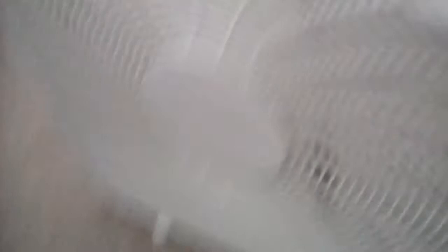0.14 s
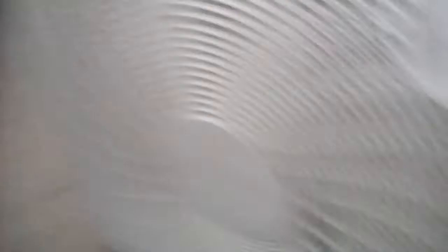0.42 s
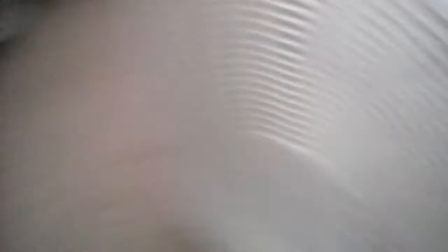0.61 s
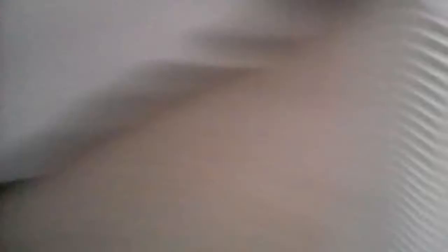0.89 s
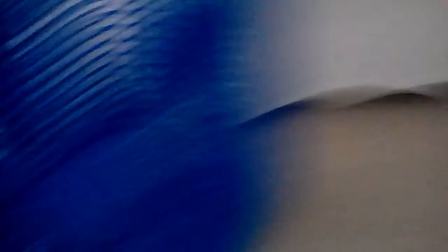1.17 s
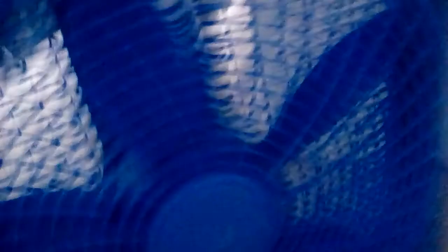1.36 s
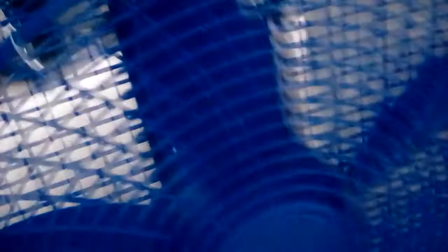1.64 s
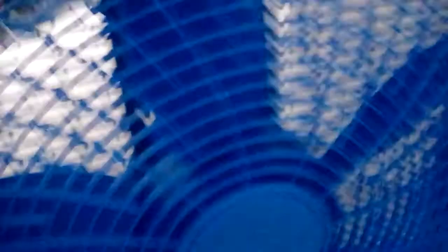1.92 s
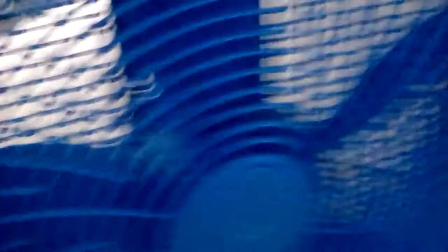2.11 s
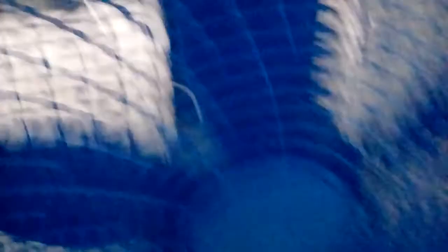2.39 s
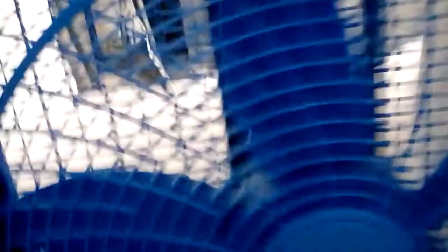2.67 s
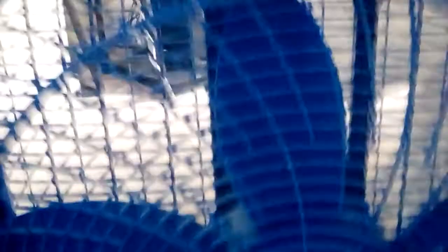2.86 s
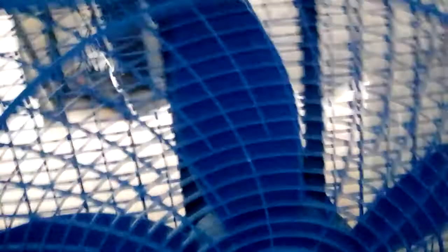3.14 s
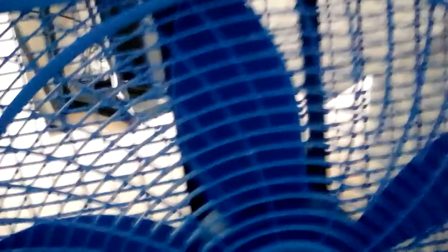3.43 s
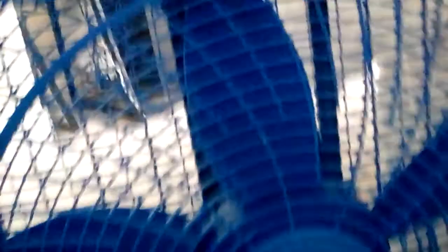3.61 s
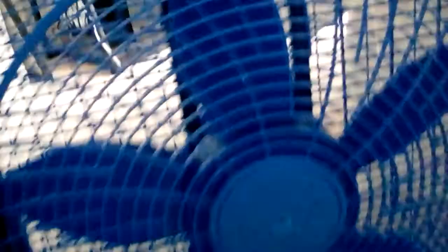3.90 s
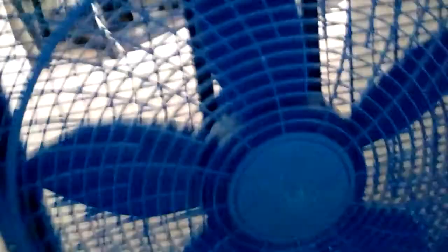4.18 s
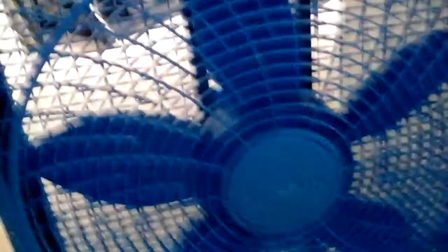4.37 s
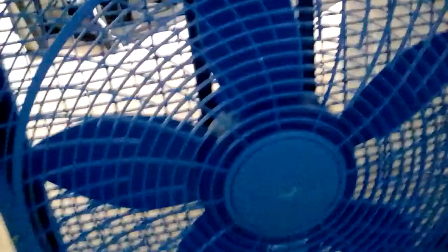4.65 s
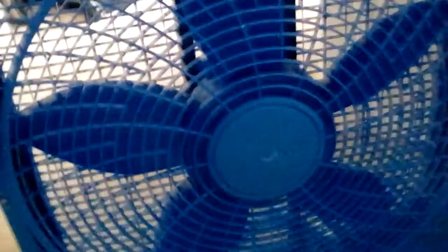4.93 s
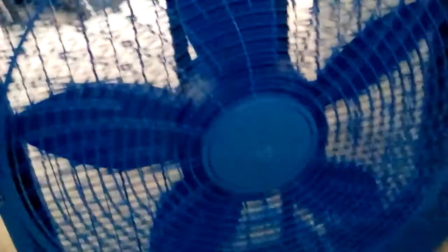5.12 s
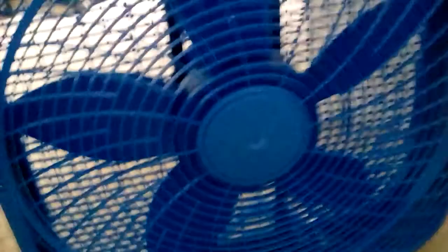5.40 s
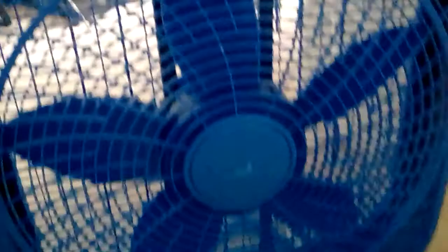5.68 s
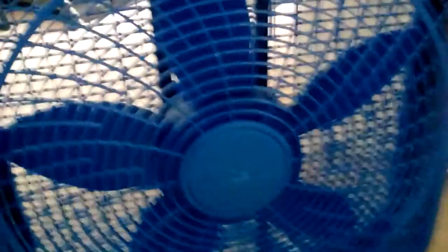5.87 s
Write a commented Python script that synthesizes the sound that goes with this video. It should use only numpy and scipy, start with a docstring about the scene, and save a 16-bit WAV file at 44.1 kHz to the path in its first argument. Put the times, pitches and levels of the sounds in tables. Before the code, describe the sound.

For the first 1.2 seconds there is a very quiet room: soft low rumble, thin hiss, and faint rustles of a hand shifting on the microphone around 0.5 to 0.7 and again near 1.1. At 1.2 a loud, crisp plastic knob snap rings the fan's housing very briefly, with a faint rattle. At 1.6 a softer tick is followed at 1.7 by a second clear, duller clack, with a tiny knock near 1.9. Meanwhile the close box fan begins turning. Its low, slightly fuzzy blade hum slides upward, fast at first and then slowing, swelling as it passes room resonances. Airy turbulence emerges by about 2 seconds and keeps growing louder and brighter, with gentle blade flutter and small changes as the microphone drifts. By 4 to 6 seconds it is a strong, full rush over a low drone, still rising slightly when it cuts off.

```python
"""A quiet room with low rumble and thin hiss; a hand shifts faintly on the microphone.
At 1.2 s a box fan is switched on close by: its plastic knob snaps through detents, ringing the housing.
From then the rotor gathers speed: blade tones climb through the room's standing waves, and the rush
of air, shaped noise pumped slightly by each blade pass, grows louder and brighter to the end.
A very faint, brief tick near 1.7 kHz falls at about 1.88 s."""
import sys
import numpy as np
from scipy import signal
from scipy.io import wavfile
from scipy.ndimage import uniform_filter1d

SR = 44100
rng = np.random.default_rng(int(sys.argv[2]) if len(sys.argv) > 2 else 0)


def linear_from_db(decibels):
    """Turn decibels (scalar or array-like) into linear amplitude factors; 0 gives 1."""
    return 10 ** (np.asarray(decibels, float) / 20)


def waveform_to_disk(signal):
    """Save audio, clipped to [-1, 1], as 16-bit WAV at the path in sys.argv[1]."""
    frames = np.transpose(np.atleast_2d(signal))
    scaled = np.clip(frames, -1, 1) * 32767
    samples = np.round(scaled).astype(np.int16)
    wavfile.write(sys.argv[1], SR, samples)


N = 266099

REFERENCE_HZ = 92  # blade rate at which the fan's levels are given
SWITCH_ON_S = 1.2
GUSTS_ABOVE_HZ = 3600

# The hand-held microphone drifts to and from the blades. Each row: time in seconds, level in dB.
NEARNESS = [(1.2, 2), (1.4, 2.5), (1.6, 1.5), (1.8, 0), (2.0, -1.08), (2.6, -0.8086), (2.75, -0.69),
            (2.95, 0), (3.3, -0.829), (4.1, 1.1127), (4.8, 0.5), (5.15, 1.632), (5.6, 1), (6.03, 0.3252)]


def evened(x):
    """Scales to rms 1."""
    return x / np.sqrt(np.mean(x ** 2) + 1e-20)


def read(points, hz):
    """Reads a table on a log-frequency axis."""
    f, value = np.transpose(points)
    return np.interp(np.log(hz + 1), np.log(f + 1), value)


def follow(rows, t):
    """Reads a curve at times t."""
    return np.interp(t, *np.transpose(rows))


def treble_share(hz, corner_hz):
    """Weight rising from 0 in the bass to 1 well above the corner."""
    return 1 / (1 + (corner_hz / (hz + 1)) ** 4)


def standing_db(hz):
    """Lift that the room's standing waves give at each frequency."""
    # Each row: frequency in Hz, width in Hz, lift in dB.
    standing = [(124.16, 31, 5), (151.75, 16, 4), (173.31, 18, 6), (200, 10, -1), (231.73, 4.8, 4),
                (257.66, 5.6, 0.5), (284.71, 12, 4), (299.07, 23, -3), (334.47, 21, 5.5), (455.1, 57, -2),
                (719.19, 27, 4.5)]
    return sum(db / (1 + ((hz - f) / (width / 2)) ** 2) for f, width, db in standing)


def noise(field_db, patchy_db, flicker_db=0, gust_db=0):
    """Random short-time spectra shaped by field_db(s, Hz), with drifting patches and treble puffs and gusts."""
    flicker_above_hz = 6200
    t = np.arange(N // 512 + 5)[:, None] * 512 / SR
    hz = np.fft.rfftfreq(2048, 1 / SR)
    a, b, patches, puffs, gusts = rng.standard_normal((5, len(t), len(hz)))

    def smooth(x, frames, bins):
        return evened(uniform_filter1d(uniform_filter1d(x, size=frames, axis=0), size=bins, axis=1))

    patches = smooth(patches, 5, 8)
    puffs = smooth(puffs, 2, 120) * treble_share(hz, flicker_above_hz)
    gusts = smooth(gusts, 7, 60) * treble_share(hz, GUSTS_ABOVE_HZ)
    level_db = field_db(t, hz) + patchy_db * patches + flicker_db * puffs + gust_db * gusts
    z = (a + 1j * b) * linear_from_db(level_db)
    return signal.istft(z.T, nperseg=2048, noverlap=1536)[1][:N]


def wander(width_hz):
    """Slow complex noise of rms 1, from two equal one-pole low-passes."""
    r = np.exp(-np.pi * width_hz / SR)
    z = rng.standard_normal(N + SR) + 1j * rng.standard_normal(N + SR)
    z = signal.lfilter([1], [1, -r], z)
    z = signal.lfilter([1], [1, -r], z)[SR:]  # the first second only settles the filters
    return z / np.sqrt(np.mean(abs(z) ** 2))


def speed(t):
    """Blades passing a strut each second: a quick first pull of the motor, then a slow approach to the top."""
    top_hz, spin_up_s = 105.5, 2.3  # spin_up_s and kick_s are time constants
    kick_share, kick_s = .168, .05
    on = np.maximum(t - SWITCH_ON_S, .02)
    return top_hz * (1 - (1 - kick_share) * np.exp(-on / spin_up_s) - kick_share * np.exp(-on / kick_s))


def rush(t, hz, turns):
    """Turbulence: its spectrum slides up as the blades gain speed, and each blade pass pumps it slightly."""
    # Eddy noise at the reference rate. Each row: frequency in Hz, relative density in dB per Hz.
    eddies = [(30, 2), (150, -1.5), (500, -1.5), (1600, -5.5), (3000, -12), (4500, -15.5), (6500, -20.5),
              (8500, -30.5), (12000, -48.5), (24000, -75.5), (150000, -150)]
    # Fixed colour of frame and microphone, plus a steep drop near 15.8 kHz.
    # Each row: frequency in Hz, gain in dB.
    frame = [(15, -20), (27, -10), (45, -21), (100, -8), (300, -2.5), (500, .5), (1000, -1.5), (1800, .5),
             (2600, -1.5), (3100, -4.5), (3700, -4.5), (4300, -9.5), (5100, -11), (5900, -6), (6500, -4),
             (6900, -6.5), (7400, -7), (8100, -11), (9400, -5), (10500, -6), (12000, -9), (15700, -15),
             (15850, -32)]
    # Blade-tip hiss as the microphone turns. Each row: time in seconds, treble lift in dB.
    aim = [(1.2, 0.5), (2.0, 3), (2.45, -5), (2.75, -0.5), (2.95, -3.5), (3.3, -0.5), (3.8, -2), (4.5, 0.5),
           (5.2, -0.5), (6.03, 0.5)]
    reference_db, growth_db_per_db = -32.5, 2.521  # growth is per dB of speed

    def colour(s, f):
        slide = (REFERENCE_HZ / speed(s)) ** 1.0047
        db = read(eddies, f * slide) + read(frame, f) + 0.5 * standing_db(f)
        db = db + follow(aim, s) * treble_share(f, GUSTS_ABOVE_HZ)
        core = (f > 300) & (f < 3000)  # this band holds equal power in every frame
        return db - 10 * np.log10(np.sum(linear_from_db(2 * db[:, core]), axis=1, keepdims=True))

    air = evened(noise(colour, patchy_db=0.6796, flicker_db=2.5, gust_db=0.9746))
    air = air * (1 + 0.033 * np.cos(2 * np.pi * turns))
    speed_db = 20 * np.log10(hz / REFERENCE_HZ)
    level_db = reference_db + growth_db_per_db * speed_db + follow(NEARNESS, t)
    return air * linear_from_db(level_db) * (t > SWITCH_ON_S)


def tones(t, hz, turns):
    """Clean multiples of the blade rate, and a fuzzy stack just under them from blades cutting swirling eddies."""
    # Clean tones, one row a multiple. Each row: level at the reference rate in dB, growth in dB per dB of speed.
    blades = [(-62.5, 11), (-43.5, 3), (-48, 3.5), (-57, 2.5), (-51.5, 2), (-58.5, 1.5)]
    # Fuzzy stack, one row a multiple. Each row: level at the reference rate in dB,
    # growth in dB per dB of speed, width in Hz.
    swirl = [(-57, 5, 3.511), (-52.5, 1.451, 3.3), (-47, 2.5, 8), (-46, 2.5, 10), (-48.5, 2, 6.7),
             (-50, 2.5, 15), (-49, 3, 13.346)]
    swirl_lag = .925  # the eddies swirl after the blades, so they are cut at this share of the blade rate
    nearness_share = 0.41  # share of the nearness in dB that the tones feel
    speed_db = 20 * np.log10(hz / REFERENCE_HZ)
    both = np.zeros(N)
    for k, (db, growth) in enumerate(blades, 1):
        waver = 1 + 0.18 * wander(width_hz=3.2)
        carrier = np.exp(2j * np.pi * k * turns)
        both += linear_from_db(db + growth * speed_db + standing_db(k * hz)) * (waver * carrier).real
    for k, (db, growth, width) in enumerate(swirl, 1):
        waver = 0.29 + 0.84597 * wander(width)
        carrier = np.exp(2j * np.pi * k * swirl_lag * turns)
        both += linear_from_db(db + growth * speed_db + standing_db(k * swirl_lag * hz)) * (waver * carrier).real
    return np.sqrt(2) * both * linear_from_db(nearness_share * follow(NEARNESS, t)) * (t > SWITCH_ON_S)


def knob():
    """Each strike rings the housing modes near its own pitch, treble first; a faint echo and thin rattle follow."""
    # Each row: start in seconds, level in dB, centre of the blow's spectrum in Hz, spread in octaves.
    strikes = [(1.2094, -47, 2500, 0.7296), (1.2126, -13.5, 12500, 0.3796), (1.2124, -6.5, 299, 0.9434),
               (1.2123, -4, 3891, 0.7397), (1.2124, -11.5, 3600, 0.14), (1.2128, -3.5, 811.1, 0.5344),
               (1.2135, -10, 1750, 0.288), (1.6082, -32, 2945, 0.3493), (1.6082, -26, 1750, 0.157),
               (1.6085, -40.5, 5800, 0.12), (1.6087, -18.5, 434.4, 0.5089), (1.6908, -21, 6300, 0.4685),
               (1.691, -12.5, 168.8, 1.115), (1.691, -13, 2918, 0.2762), (1.6904, -9.5, 2056, 0.2073),
               (1.6911, -14.5, 720, 0.2916), (1.879, -21.5, 200, 0.871)]
    # Plastic housing modes. Each row: frequency in Hz, level in dB, ungripped t60 in seconds.
    housing = [(130, -8, 0.02), (190, -5.5, 0.011), (299.33, -0.5, 0.015), (397, -6, 0.009),
               (520, -11, 0.0049), (694.8, 2.5, 0.011), (843, -2.5, 0.0086), (1161.3, -0.5, 0.019),
               (1776, -7.5, 0.0097), (2076.8, 8.5, 0.0079), (2500, -0.5, 0.0096), (2893.4, -7.5, 0.012),
               (3585.5, 2, 0.0058), (5133, -12.5, 0.0033), (5900, -6.5, 0.005), (7410, 2, 0.0034),
               (8378.5, -6.5, .003), (9910, -8, 0.0045), (11200, -10, 0.0041), (12960, -7, .003),
               (15300, -16.5, .003)]
    bend_s = 0.00042  # bending waves carry a 1 kHz mode to the panel in this time, lower modes later
    grip_s = .0075  # fingers on the knob choke the ringing
    echo_db = -39
    rattles_per_s, rattle_t60_s, rattle_above_hz, rattle_db = 2500, .3, 2500, -36  # the grille buzzes

    t, out = np.arange(2000) / SR, np.zeros(N)
    f, level, t60 = np.transpose(housing)[:, :, None]
    since = np.maximum(t - bend_s * np.sqrt(1000 / f), 0)
    modes = linear_from_db(level - 60 * since / t60) * np.sin(2 * np.pi * f * since)
    for s, db, centre, spread in strikes:
        # a narrower or lower blow starts more gently
        touch = np.sin(np.pi / 2 * np.clip(since * centre * spread / 0.43574, 0, 1)) ** 2
        share = linear_from_db(-4.7 * (np.log2(f / centre) / spread) ** 2)
        ring = np.sum(share * modes * touch, axis=0)
        out[round(s * SR):][:len(t)] += linear_from_db(db) * ring * np.exp(-(t / grip_s) ** 4)

    lag = np.arange(SR // 4) / SR
    decay = linear_from_db(-60 * lag / .03) + linear_from_db(-22.5 - 60 * lag / .25)
    echo = rng.standard_normal(len(lag)) * decay * (lag > .002)
    clicks = rng.standard_normal(len(lag)) * (rng.random(len(lag)) < rattles_per_s / SR)
    rattle = clicks * linear_from_db(-60 * lag / rattle_t60_s) * (lag > .004)
    bright = signal.sosfilt(signal.butter(2, rattle_above_hz, "high", fs=SR, output="sos"), out)
    echoed = linear_from_db(echo_db) * signal.oaconvolve(out, echo / np.linalg.norm(echo))[:N]
    rattled = linear_from_db(rattle_db) * signal.oaconvolve(bright, rattle / np.linalg.norm(rattle))[:N]
    low_cut_hz = 90  # the strikes reach the microphone with no deep bass
    return signal.sosfilt(signal.butter(4, low_cut_hz, "high", fs=SR, output="sos"), out + echoed + rattled)


def room(t):
    """Shaped noise for rumble and hiss, rustle swells for a hand on the microphone, one very faint tick."""
    # Each row: frequency in Hz, relative density in dB per Hz.
    room_colour = [(15, -53.5), (25, -24.5), (108, 3), (142, 1), (155, -5.5), (175, -5.5), (208, -20.5),
                   (240, -6.5), (266, -21.5), (358, -24.5), (809, -37), (1180, -37.5), (1600, -40),
                   (3060, -43), (5900, -44), (7400, -44), (8300, -50), (10500, -51.5), (15700, -62),
                   (15850, -75.5)]
    # Each row: frequency in Hz, relative density in dB per Hz.
    rustle_colour = [(250, -19), (600, -1), (1200, -7), (1700, -5), (2300, -15), (2800, -10.5), (4000, -27),
                     (9000, -52.5)]
    # Hand shifts. Each row: peak time in seconds, level in dB, swell and fade time constants in seconds.
    shifts = [(.18, -84, 0.103, 0.01181), (.455, -77.5, 0.0245, 0.041), (.57, -68, 0.0573, 0.0337),
              (.702, -68.5, 0.00484, 0.00504), (1.031, -71.5, 0.07375, 0.1151),
              (1.155, -69, 0.03967, 0.039), (1.26, -69, 0.044, 0.0772), (1.5, -65.5, 0.0029, .006),
              (1.7, -54.5, 0.044, .05)]
    # A very faint, brief tick. One row: time in seconds, level in dB, pitch in Hz,
    # width in Hz, spread in seconds (sign irrelevant).
    faint_tick = (1.8767, -69, 1700, 150, -0.0023)
    room_db = -53

    hush = noise(lambda s, hz: read(room_colour, hz), patchy_db=1.0, flicker_db=3.0, gust_db=0.5921)
    hush = linear_from_db(room_db) * evened(hush)
    rustle = evened(noise(lambda s, hz: read(rustle_colour, hz), patchy_db=3.0))
    strokes = np.zeros(N)
    for s, db, swell, fade in shifts:
        strokes += linear_from_db(db) * np.exp(-abs(t - s) / np.where(t < s, swell, fade))
    s, db, hz, width, spread = faint_tick
    wave = ((1 + .5 * wander(width)) * np.exp(2j * np.pi * hz * t)).real
    tick = linear_from_db(db) * np.exp(-((t - s) / spread) ** 2) * wave
    return hush + rustle * strokes + tick


def scene():
    """Fan, knob and room in one channel."""
    t = np.arange(N) / SR
    hz = speed(t)
    turns = np.cumsum(hz) / SR  # blade passes so far
    return (rush(t, hz, turns) + tones(t, hz, turns) + knob() + room(t))[None]


def roll_off(x):
    """The treble ends steeply here."""
    return signal.sosfilt(signal.butter(12, 16670, fs=SR, output="sos"), x)


def record(dry):
    """A steep low-pass limits the band of the finished mix."""
    top_edge_hz = 16300
    mix = signal.sosfilt(signal.butter(8, top_edge_hz, fs=SR, output="sos"), dry)
    return roll_off(mix)


dry = scene()
out = record(dry)
waveform_to_disk(out)
```